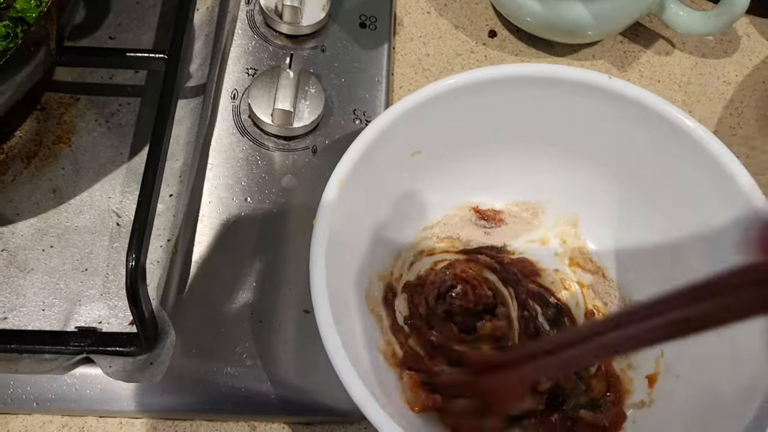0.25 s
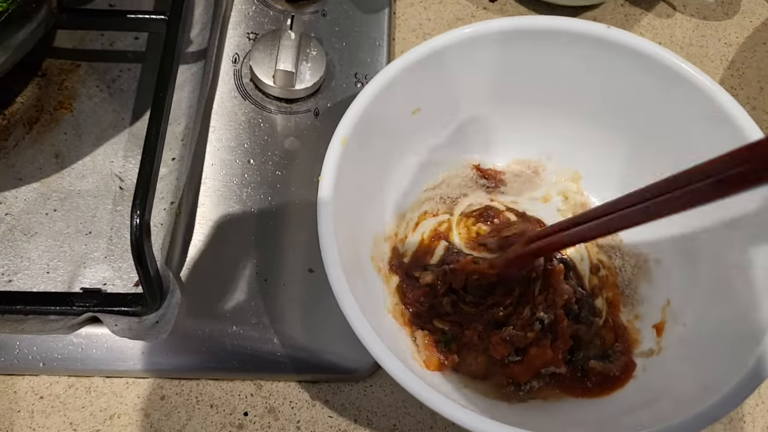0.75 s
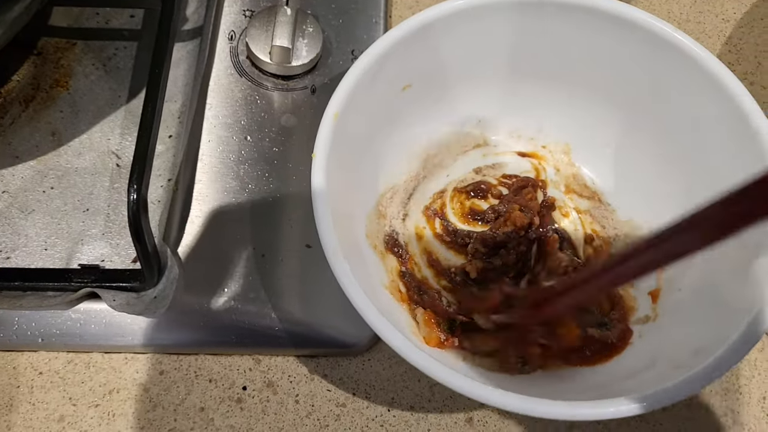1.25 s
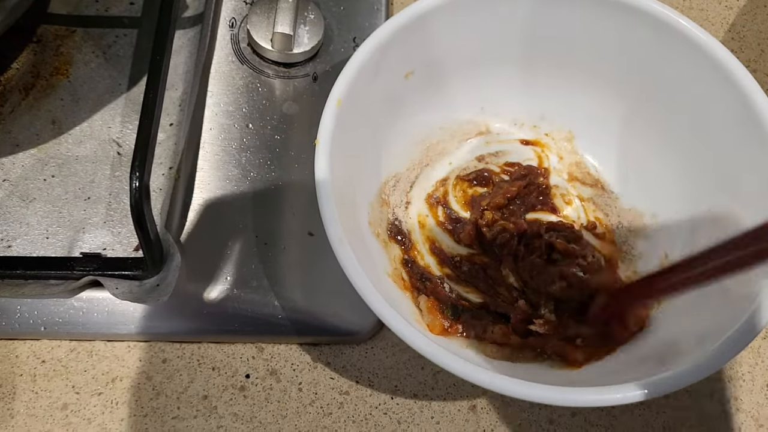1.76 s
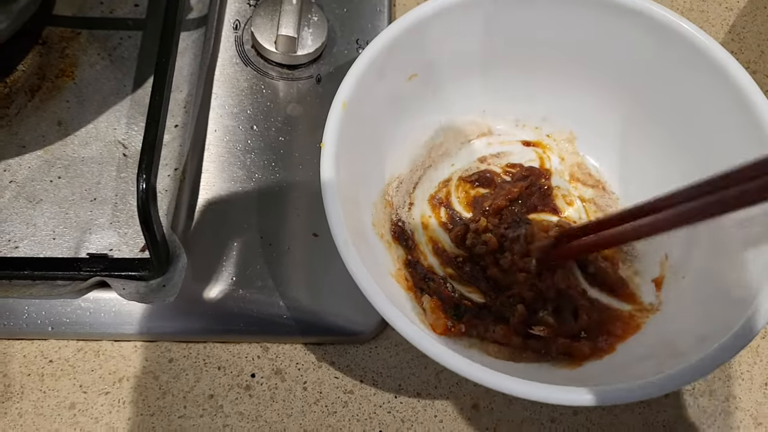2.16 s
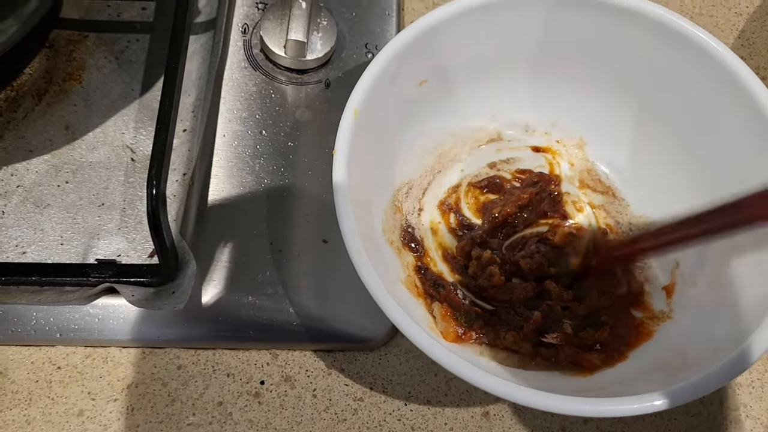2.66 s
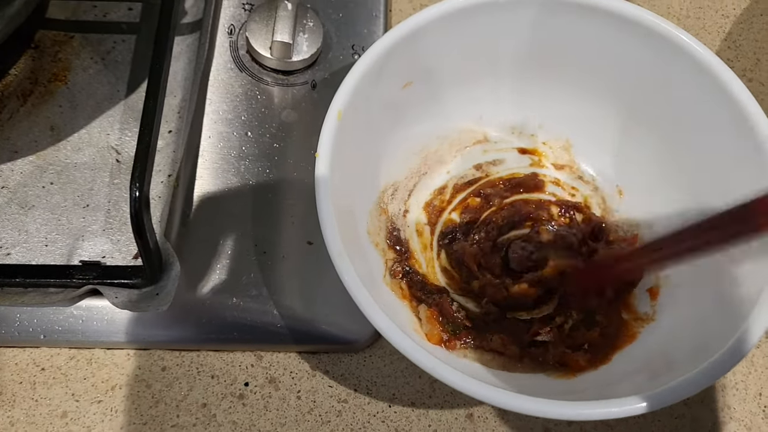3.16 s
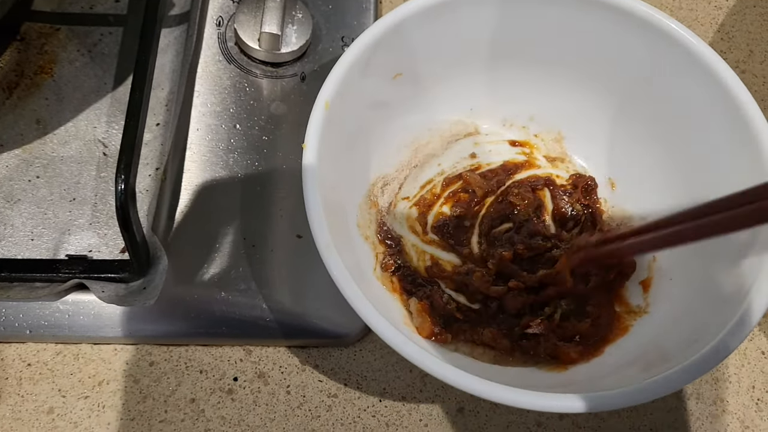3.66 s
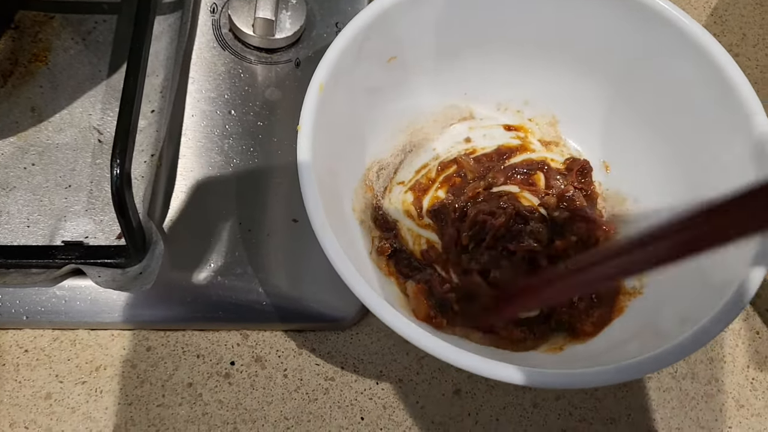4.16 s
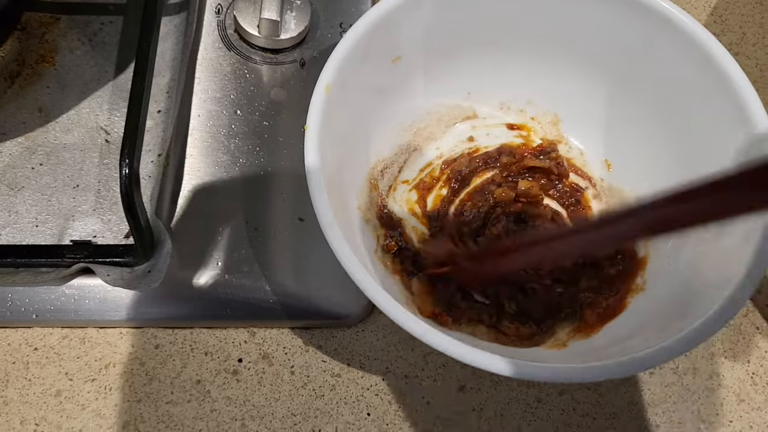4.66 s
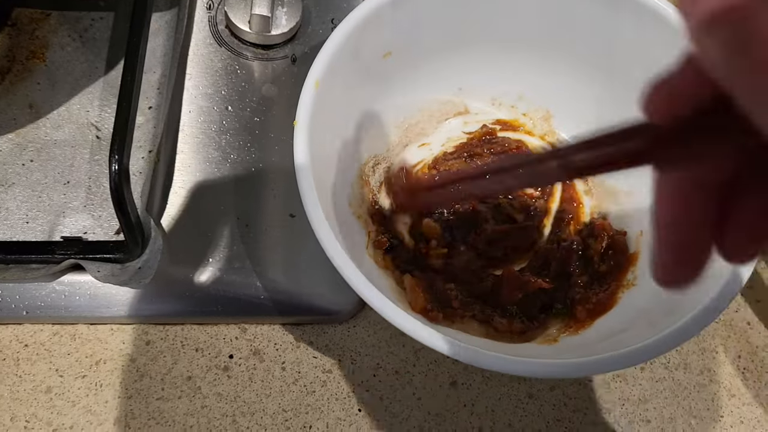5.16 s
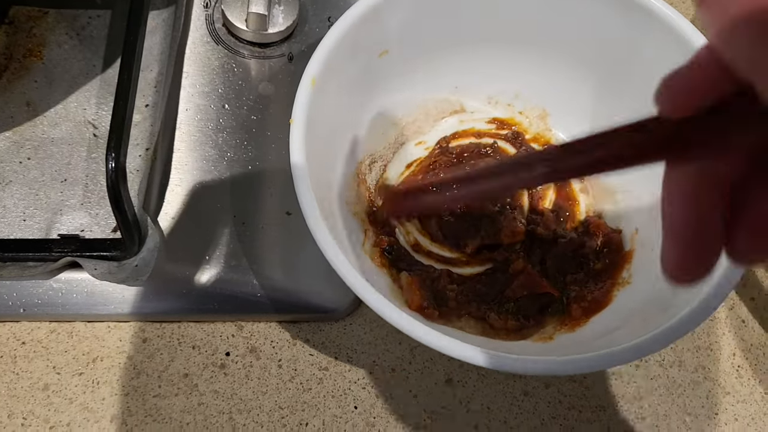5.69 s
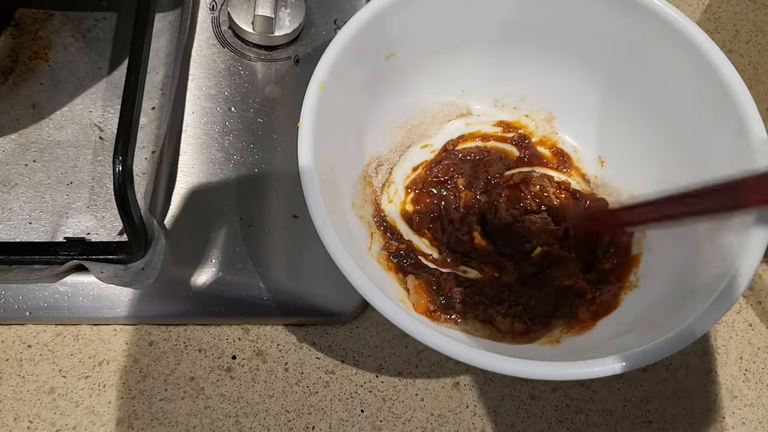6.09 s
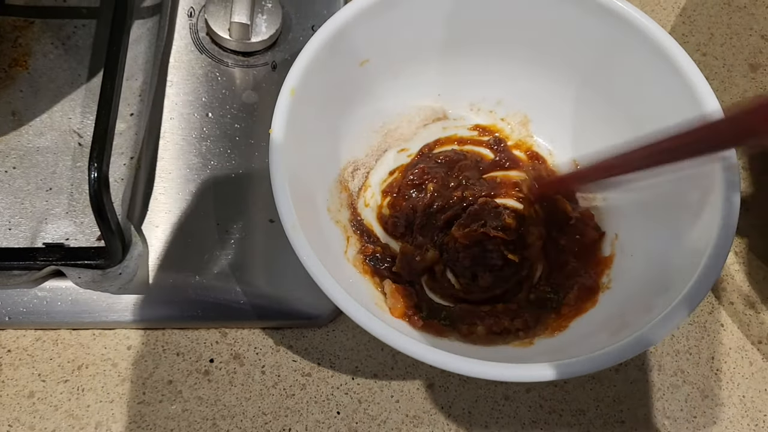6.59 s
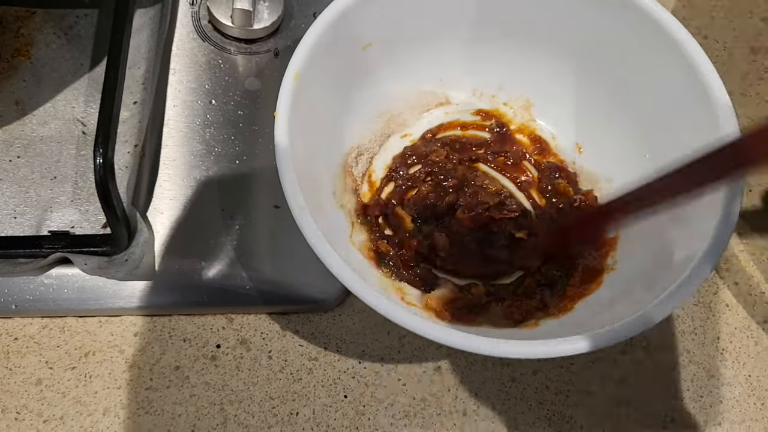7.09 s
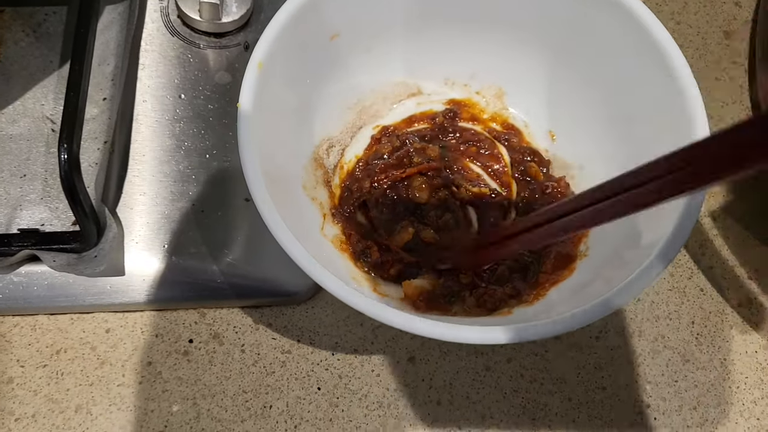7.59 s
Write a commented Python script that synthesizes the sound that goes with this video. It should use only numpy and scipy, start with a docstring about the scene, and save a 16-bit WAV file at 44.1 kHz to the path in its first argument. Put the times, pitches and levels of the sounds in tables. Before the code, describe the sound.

Thick sauce is worked with wooden chopsticks, about three or four strokes a second, right at the microphone. Each stroke squelches, pops and crackles, with soft rubbing along the bowl. Short dry clacks and bowl thumps punctuate the first two seconds, then become rare and faint. Smacks get louder again near the end. Dry, short kitchen reflections; quiet appliance hum and wavering low rumble behind.

```python
"""Wet smacks and a fine crackle stand out throughout: chopsticks stir a thick sauce in a light bowl, close up.
Air pockets ring as they open, torn film and very bright ticks crackle, and moving resonances shape fizz and rub.
The tips tap the ringing wall, and now and then the bowl rocks on the counter and excites its low modes.
An appliance hums low in the room over a wavering drone and shaped noise for the air."""
import sys
import numpy as np
from scipy import signal
from scipy.fft import rfft, irfft, next_fast_len
from scipy.io import wavfile
from scipy.ndimage import uniform_filter1d

SR = 44100
rng = np.random.default_rng(int(sys.argv[2]) if len(sys.argv) > 2 else 0)


def wrap_up_sound(samples):
    """Save the sound to the file named by the first command line argument, as 16-bit audio."""
    columns = np.atleast_2d(samples).T
    # keep every value between -1 and 1, then stretch to whole-number steps
    tamed = np.clip(columns, -1, 1)
    steps = np.round(tamed * 32767).astype(np.int16)
    wavfile.write(sys.argv[1], SR, steps)


N = 345744

# Loud air pockets opening in the sauce. Each row: start in seconds, relative pop level in dB,
# pocket pitch in Hz, relative snap level of the film in dB, left over right in dB.
LOUD_SMACKS = [(0.0678, -38, 4670, -37, 12), (0.1877, -37, 3150, -44, -3), (0.2089, -18, 3030, -42, -3),
               (0.2338, -29, 3040, -39, -8), (0.4671, -26.5, 2840, -40, -2.5),
               (0.5132, -36, 2570, -54, -18), (0.6457, -33.5, 2580, -45, -11),
               (0.6995, -28.5, 1890, -46, -7), (1.0982, -27, 3300, -40, 6), (1.1375, -31, 1960, -43, -1),
               (1.1674, -39, 2430, -47, -3), (1.4755, -23, 2350, -36, -9), (1.4816, -20, 3200, -33, -2),
               (1.505, -24, 1610, -46, -2), (1.6888, -13.5, 2030, -19.5, -4),
               (1.7205, -12.5, 2370, -34, -4), (1.7244, -22, 1400, -43, 3), (1.7957, -26, 5260, -38, 5),
               (1.8494, -23.5, 1870, -34, 4), (2.1286, -32.5, 2300, -38.5, -16.5),
               (2.3205, -34, 4600, -44, 4), (2.4346, -30.5, 1910, -35, -5), (2.4391, -30, 3030, -44, -8.5),
               (2.46, -27, 2870, -52, -5), (2.5302, -37, 3210, -46, -3), (2.8252, -14, 2320, -35.5, -13.5),
               (2.803, -33, 1950, -51, -10), (2.9059, -33.5, 2690, -43, 7), (2.946, -28.5, 1660, -37, -5),
               (3.112, -37, 3100, -36.5, -15), (3.2972, -36, 1270, -37, -3), (3.3212, -30, 2710, -34, -5),
               (3.353, -32.5, 3020, -35.5, -8), (3.482, -22, 3350, -26, 2), (3.4972, -22.5, 3200, -35, -7),
               (3.6623, -28.5, 2010, -41, -2), (3.685, -29, 2100, -39, -1),
               (3.7017, -31.5, 1600, -37.5, -10), (3.934, -26.5, 2580, -29, -11),
               (3.9429, -21, 1350, -36, -3), (3.965, -19.5, 1490, -42, 4), (4.1428, -40, 1400, -32.5, -7),
               (4.1674, -25.5, 2460, -37, -2), (4.1734, -25, 3280, -32.5, -7), (4.1982, -30, 2030, -41, -9),
               (4.2408, -27, 2960, -46, -4), (4.4138, -20, 1830, -42, -2.5), (4.4314, -27, 3000, -33, -12),
               (4.621, -45.5, 1740, -36.5, -7), (4.727, -27, 2220, -36.5, -5.5),
               (4.7582, -30, 2200, -49, 1), (4.8817, -35, 1760, -36, -7), (4.9164, -30, 3150, -39, -11.5),
               (4.9465, -27, 1970, -38, -5), (4.9817, -36, 2270, -42, -4), (5.187, -43, 2980, -34.5, -15),
               (5.3848, -39, 2300, -43, 2), (5.4214, -31, 2540, -40, -1), (5.5199, -57, 1780, -37, 1),
               (5.6703, -32.5, 1390, -47, -6), (5.7016, -19.5, 2740, -33.5, 0.5),
               (5.7074, -23.5, 2570, -38, 0), (5.7552, -23.5, 2420, -33, -15),
               (5.9308, -42.5, 1830, -41, -12), (6.0285, -29, 2780, -31.5, -10.5),
               (6.113, -27, 1550, -40, -2), (6.123, -23.5, 3250, -30, -13.5), (6.264, -25, 2900, -49, -1.5),
               (6.2787, -22.5, 1450, -30.5, -4), (6.4926, -18, 2020, -35.5, 3),
               (6.5076, -24, 1960, -49, -4), (6.5406, -32, 1680, -39, 11), (6.551, -25, 1700, -40, -12),
               (6.645, -43, 2110, -36, -11), (6.71, -33, 2460, -44, -3),
               (6.7239, -14.5, 2570, -27.5, -12.5), (6.7727, -30, 2630, -40.5, 9),
               (6.9867, -25, 1670, -41, -2), (6.9909, -26, 2960, -31, -4), (7.2237, -34.5, 1460, -49, -6),
               (7.2607, -26, 3330, -35, -2.5), (7.3013, -25.5, 1170, -30.5, 1.5),
               (7.5243, -20, 1450, -50, 1), (7.5353, -10, 2300, -32, -6), (7.7924, -19, 3040, -34.5, -2)]
# Very bright ticks, many together with smacks and taps. Each row: start in seconds, relative level in dB.
BRIGHT_TICKS = [(0.284, -14), (0.766, -23.5), (1.454, -28), (2.0177, -29), (2.129, -20), (2.2892, -27),
                (2.687, -21), (2.905, -22), (2.969, -23), (3.865, -28), (3.935, -23), (4.138, -24.5),
                (4.3557, -20.5), (4.621, -26), (5.698, -25), (6.7104, -28), (7.46, -23)]
# Pushes of the sticks through the sauce. Each row: time of full strength in seconds,
# hold in seconds, relative squelch level in dB, relative crackle level in dB.
PUSHES = [(0.0, 0.0087, -45, -44), (0.176, 0.056, -47, -44.5), (0.33, 0.092, -51, -45),
          (0.688, 0.075, -47.5, -45.5), (0.94, .07, -51, -47), (1.093, 0.076, -41, -46),
          (1.256, 0.12, -55, -51), (1.472, 0.074, -44, -45.5), (1.72, 0.11, -45.5, -46.5),
          (1.967, 0.024, -52.5, -47), (2.155, 0.037, -48, -45.5), (2.22, 0.085, -50.5, -49.5),
          (2.423, 0.033, -43.5, -48.5), (2.81, 0.18, -42.5, -50), (3.052, .08, -51.5, -49.5),
          (3.312, 0.044, -45.5, -43.5), (3.47, 0.043, -46.5, -48.5), (3.661, 0.037, -41, -45),
          (3.888, 0.017, -52, -43.5), (3.933, 0.081, -42.5, -50.5), (4.148, 0.082, -42.5, -45.5),
          (4.41, 0.11, -43, -46.5), (4.722, 0.084, -47, -47.5), (4.89, 0.11, -49, -50),
          (5.147, 0.079, -59, -48), (5.348, 0.078, -48, -46.5), (5.696, 0.13, -48, -46.5),
          (5.873, 0.049, -49.5, -47), (6.016, 0.066, -49, -47), (6.117, .03, -42, -53),
          (6.26, 0.054, -45.5, -49), (6.463, 0.14, -48, -49.5), (6.72, 0.068, -47, -50.5),
          (6.966, 0.043, -44.5, -48), (7.23, 0.044, -49, -49), (7.502, 0.092, -42, -50.5),
          (7.795, 0.022, -46, -55)]
# The sticks come to rest. Each row: start in seconds, end in seconds, drop in dB.
RESTS = [(0.787, 0.92, 3.5), (1.555, 1.685, 6.5), (2.017, 2.125, 26), (2.548, 2.7, 19), (3.23, 3.29, 9),
         (3.72, 3.865, 19), (4.558, 4.615, 6)]
# The tips dragging along the wall. Each row: time of full strength in seconds, hold in seconds,
# relative level in dB, resonance in Hz.
DRAGS = [(0.063, .05, -51.5, 1020), (0.206, 0.017, -41.5, 1310), (0.282, 0.1, -50, 800),
         (0.51, .05, -56.5, 900), (0.969, .06, -43.5, 980), (1.203, 0.067, -50.5, 1010),
         (1.275, 0.072, -54.5, 810), (1.49, 0.044, -49, 1360), (1.758, 0.1, -46.5, 1040),
         (1.93, 0.053, -53, 1200), (2.15, 0.072, -49, 970), (2.262, 0.048, -50.5, 650),
         (2.35, 0.078, -56, 840), (2.42, 0.044, -49.5, 1350), (2.708, 0.034, -55, 840),
         (2.826, 0.029, -49.5, 860), (2.984, 0.16, -55.5, 1080), (3.317, 0.12, -51.5, 1110),
         (3.503, 0.041, -52, 910), (3.597, 0.068, -47.5, 700), (3.939, 0.055, -43.5, 1290),
         (4.146, 0.053, -51, 1300), (4.243, 0.19, -56.5, 770), (4.402, 0.093, -51, 1290),
         (4.747, 0.048, -60, 1015), (5.118, 0.1, -54, 1140), (5.23, 0.036, -56, 720),
         (5.405, 0.089, -55.5, 1020), (5.802, .05, -54.5, 1090), (5.944, .03, -53.5, 990),
         (6.283, 0.15, -55.5, 1100), (6.472, .08, -49.5, 1220), (6.596, .04, -54, 850),
         (6.73, 0.09, -53.5, 1010), (6.902, 0.15, -53, 1110), (7.104, 0.04, -53.5, 870),
         (7.23, 0.1, -51.5, 1180)]
# Tips tapping the wall. Each row: start in seconds, relative blow level in dB,
# relative crack level in dB, tilt of the wall modes in dB per octave.
TAPS = [(0.057, -39.5, -36, -11), (0.091, -41, -55, -18), (0.286, -24.5, -32, -15), (0.299, -18.5, -25, -5),
        (0.513, -37, -56, -15), (1.044, -18.5, -23, -3), (1.205, -37, -36.5, -11),
        (1.283, -27.5, -42, -5.5), (1.689, -14.5, -29, -5), (1.722, -26.5, -48, -10),
        (2.129, -34.5, -30, -18), (2.685, -30.5, -34, -9), (3.868, -27, -32.5, -18), (3.963, -36, -49, -2),
        (4.254, -35, -52, -10.5), (5.265, -54.5, -63, -24), (5.753, -40, -44, -16), (6.281, -39.5, -41, 9),
        (7.301, -34, -49, -1.5)]
# The bowl rocking onto the counter. Each row: start in seconds, relative blow level in dB,
# tilt in dB per octave, fall on both sides of the main mode in dB per octave.
KNOCKS = [(0.302, -11, 2.5, 8), (1.045, -15.5, 0.5, -1.5), (1.284, -20, 1.5, 6), (1.689, -29, 0, -3),
          (2.129, -33.5, 1.5, -2.5), (2.683, -45.5, 12, 1.5), (3.868, -40, -3, -12), (4.259, -52.5, 4, 2),
          (5.268, -52.5, 9, -1)]
# Wall of the bowl. Each row: mode in Hz, relative level in dB, time to fall 60 dB in seconds.
WALL_MODES = [(770, -2.5, .09), (861, 2.5, .1), (935, -5.5, 0.12), (1047, 2, 0.053), (1273, 10, 0.067),
              (1474, 0, 0.11), (1650, -1, 0.045), (1820, 11.5, 0.041), (1962, 8.5, 0.091), (2300, 8, 0.063),
              (2574, 3, 0.056), (2999, 18, 0.053)]
# Bowl on its foot and the counter under it. Each row: mode in Hz, relative level in dB,
# time to fall 60 dB in seconds.
FOOT_MODES = [(95, -10, 0.3), (132, -4, 0.16), (195, -2, 0.073), (213.3, -4.5, .26), (272, -9.5, 0.17),
              (366.3, -8.5, 0.2), (397, -4.5, 0.08), (441.5, -12, .12), (566.5, -17, .11),
              (656, -22.5, 0.13)]

# Tone of the squelching pockets. Each row: frequency in Hz, relative density in dB per Hz.
SQUELCH_TONE = [(200, -25.5), (600, -21), (870, -8.5), (1100, -12.5), (1450, 2), (2100, 2), (3050, 1),
                (3600, -10), (5000, -12), (9000, -26.5)]
# Tone of the snapping film. Each row: frequency in Hz, relative density in dB per Hz.
SNAP_TONE = [(300, -42), (1200, -15.5), (3000, -3), (4400, -4), (5800, 6), (7900, 6.5), (8900, -13.5),
             (10500, -9.5), (13000, -8.5), (16000, -23)]
# Tone of the tearing film and fizz. Each row: frequency in Hz, relative density in dB per Hz.
CRACKLE_TONE = [(500, -16.5), (2500, -8.5), (4200, -7), (5700, -4.5), (7900, -0.5), (8900, -13.5),
                (10500, -10.5), (13000, -6.5), (16000, -11)]
# Tone of the rubbing tips. Each row: frequency in Hz, relative density in dB per Hz.
RUB_TONE = [(100, -16), (220, 4.5), (400, 5.5), (600, 1.5), (880, 1.5), (1250, -3), (1800, 2.5),
            (4000, -57)]
# Tone of a tap's thud and rattle. Each row: frequency in Hz, relative density in dB per Hz.
TAP_TONE = [(150, -28.5), (400, -9.5), (700, -1.5), (1150, 0), (1600, -12), (2600, -5.5), (3600, -9.5),
            (5200, -9.5), (8000, -27.5)]
# Tone of a tap's sharp crack. Each row: frequency in Hz, relative density in dB per Hz.
TAP_CRACK_TONE = [(600, -33), (1400, -12), (3200, -5), (4600, 4), (5800, 3), (7900, 1), (9000, -14),
                  (13000, -7.5), (16000, -15)]
# Tone of the low drone. Each row: frequency in Hz, relative density in dB per Hz.
DRONE_TONE = [(15, -27.5), (30, -16), (42, -0.5), (49, 5.5), (58, 1.5), (80, -17), (120, -12), (200, -39),
              (500, -54.5)]
# Tone of the room's air. Each row: frequency in Hz, relative density in dB per Hz.
ROOM_AIR_TONE = [(20, -2), (45, 1), (75, 0.5), (120, -1), (165, -12), (215, -2.5), (300, -11.5),
                 (450, -22.5), (900, -21), (2000, -28), (6000, -36.5), (16000, -33.5)]
# Swells of the low drone. Each row: time in seconds, relative level in dB.
DRONE_LEVEL = [(0, -49.5), (1.2, -48.5), (2.8, -53.5), (4.3, -48.5), (4.65, -44), (5.3, -53), (6.05, -40),
               (6.45, -39), (6.85, -43), (7.2, -40.5), (7.84, -53)]
# Appliance hum. Each row: partial in Hz, rms level in dB.
HUM = [(48.5, -56.5), (99, -61), (210, -70)]
# Diffuse sound at the two microphone ports. Each row: frequency in Hz, likeness from -1 to 1.
LIKENESS = [(60, 0.9), (150, 0.7), (300, 0.8), (640, -0.09), (1400, 0), (16000, 0)]
# Sensitivity of the two microphone ports. Each row: frequency in Hz, left over right in dB.
BALANCE = [(60, -3.4), (200, -2.3), (400, -6), (1300, -1), (2400, -4.5), (4400, 2), (8000, 0),
           (15000, -0.5)]

TIME = np.arange(N) / SR
SIZE = next_fast_len(N + SR)
FREQS = np.maximum(np.fft.rfftfreq(SIZE, 1 / SR), 1)
STEREO_HALVES = np.array([[.5], [-.5]])   # splits a left-over-right dB figure between the ports
LEFT_LAG_S, CUTOFF_HZ = .00016, 16100
STIRS_PER_S = 3.7   # mean rate of the tips' round
POCKET_LOW_HZ = 990
# a pocket's neighbours give way with it, growing as much as the pop does (in dB per dB)
CLUSTER_LEAD_S, CLUSTER_T60_S = .0062, 0.046
CLUSTER_FOLLOWS, MEAN_POP_DB = 1, -24
# pockets too small to single out; levels over the squelch and the crackle
SMALL_SMACKS_PER_S, SMALL_POP_DB, SMALL_SNAP_DB = 9, 4.5, 1
SMALL_POCKET_HZ, SMALL_POCKET_OCTAVES = 2200, 0.79
PUSH_ATTACK_S, PUSH_RELEASE_S = 0.033, 0.18   # release: time to fall 60 dB
DRAG_ATTACK_S, DRAG_RELEASE_S = .03, 0.23
# relative levels while the sticks move on between pushes
BETWEEN_SQUELCH_DB, BETWEEN_CRACKLE_DB, BETWEEN_RUB_DB = -55.5, -52, -61.5
SETTLE_S = .035   # time the sauce takes to fall quiet


def smacks(rows, pop_db, cluster_db, snap_db, cycles, gap_hz, gap_db):
    """The film snaps, the pocket rings with the gap between the sticks, and its neighbours give way."""
    pops, clusters, snaps = np.zeros((3, 2, N))
    for s, level_db, hz, film_db, pan_db in rows:
        ring = pocket(hz, cycles) + from_db(gap_db) * pocket(gap_hz, cycles=1.58)
        add(pops, s, from_db(level_db + pop_db + pan_db * STEREO_HALVES) * ring)
        swarm_db = MEAN_POP_DB + CLUSTER_FOLLOWS * (level_db - MEAN_POP_DB) + cluster_db
        swarm = from_db(swarm_db) * cluster(CLUSTER_LEAD_S, CLUSTER_T60_S)
        add(clusters, s - CLUSTER_LEAD_S, swarm)
        add(snaps, s, from_db(film_db + snap_db) * crack(t60=0.02, spray=0.91))
    pops = low_cut(pops + 1e-18, POCKET_LOW_HZ)   # small openings radiate little bass
    return pops + colour(clusters, SQUELCH_TONE) + colour(snaps, SNAP_TONE)


def pocket(hz, cycles):
    """A pocket of air swells and rings for a few cycles, under an envelope of height 1."""
    turns = TIME[:SR // 50] * hz
    envelope = (turns / cycles * np.exp(1 - turns / cycles)) ** 2
    return envelope * np.sin(2 * np.pi * turns)


def small_smacks(squelch, crackle, spread_db, pan_db):
    """Faint pockets open at random, their level following the stirring; rows like LOUD_SMACKS."""
    rows = []
    for when, size, pitch, side in rng.random((int(SMALL_SMACKS_PER_S * N / SR), 4)):
        i = int(when * N)
        size_db = spread_db * (2 * size - 1)
        pop_db = 20 * np.log10(squelch[i]) + SMALL_POP_DB + size_db
        film_db = 20 * np.log10(crackle[i]) + SMALL_SNAP_DB + size_db
        hz = SMALL_POCKET_HZ * 2 ** (SMALL_POCKET_OCTAVES * (2 * pitch - 1))
        rows.append((i / SR, pop_db, hz, film_db, pan_db * side))
    return rows


def bright_ticks(tick_db, low_hz):
    """Very bright ticks, many together with smacks and taps: clicks with a spray, their lows cut."""
    out = np.zeros(N)
    for s, level_db in BRIGHT_TICKS:
        add(out, s, from_db(level_db + tick_db) * crack(t60=0.013, spray=1.4))
    return low_cut(out, min(low_hz, .4 * SR))


def effort():
    """Gains of squelch, crackle and rub: pushes and drags swell over a floor that sinks at each rest."""
    drop_db = sum(db * np.clip((TIME - start) / SETTLE_S, 0, 1) * (TIME < end) for start, end, db in RESTS)
    moving = from_db(-drop_db)
    squelch = from_db(BETWEEN_SQUELCH_DB) * moving
    crackle = from_db(BETWEEN_CRACKLE_DB) * moving
    rub = from_db(BETWEEN_RUB_DB) * moving
    for s, length, squelch_db, crackle_db in PUSHES:
        push = swell(s, length, PUSH_ATTACK_S, PUSH_RELEASE_S)
        squelch = np.maximum(squelch, from_db(squelch_db) * push)
        crackle = np.maximum(crackle, from_db(crackle_db) * push)
    for s, length, db, _ in DRAGS:
        rub = np.maximum(rub, from_db(db) * swell(s, length, DRAG_ATTACK_S, DRAG_RELEASE_S))
    return squelch, crackle, rub


def stirring(squelch, crackle, squelch_db, crackle_db, fizz_db, clump_db):
    """Small pockets squelch in clumps, film tears in ticks, and air in narrow gaps fizzes at a wandering pitch."""
    sticky = rms_one(from_db(clump_db * np.clip(wander(per_s=60), -2, 2)))
    pockets = grains(per_s=480, spread_db=2.5, even_s=0.12, bed=0.28)
    pockets = from_db(squelch_db) * squelch * sticky * pockets
    ticks = from_db(crackle_db) * crackle * grains(per_s=1600, spread_db=7.0, even_s=0.11, bed=0.54)
    fizz = grains(per_s=4000, spread_db=5.5, even_s=0.052, bed=0.18)
    fizz = from_db(fizz_db) * crackle * sticky * fizz
    gap_hz = 5700 * 2 ** np.clip(0.39 * wander(per_s=45), -1, 1)
    film = ticks + glide(fizz, gap_hz, width_hz=1350)
    return colour(pockets, SQUELCH_TONE) + colour(film, CRACKLE_TONE)


def dragging(rub, rub_db):
    """The tips slip along the wall; the resonance slides from each drag's place to the next."""
    rub_hz, = in_time([(s + length / 2, hz) for s, length, _, hz in DRAGS])
    slips = from_db(rub_db) * rub * grains(per_s=1100, spread_db=4.0, even_s=0.056, bed=0.54)
    return colour(glide(slips, rub_hz, width_hz=530), RUB_TONE)


def wall(x, ring_db):
    """The wall of the bowl rings faintly with whatever happens in the sauce."""
    ring = ringing(WALL_MODES, 0, 0, 1360, detune=.004)
    ring = ring / abs(rfft(ring)).max()   # strongest frequency at unit gain
    return x + from_db(ring_db) * signal.oaconvolve(x, ring[None], axes=1)[:, :N]


def taps(thud_db, rattle_db, ring_db, crack_db):
    """A wooden tip hits the wall: a crack, a short thud, a rattle of the tip and the ring of the wall."""
    thuds, rings, cracks = np.zeros((3, N))
    for s, level_db, sharp_db, tilt_db in TAPS:
        add(thuds, s, from_db(level_db + thud_db) * crack(t60=0.0022, spray=0.46))
        add(thuds, s, from_db(level_db + rattle_db) * cluster(0.0015, t60=0.11))
        ring = ringing(WALL_MODES, tilt_db, 0, 1430, detune=0.0084)
        add(rings, s, from_db(level_db + ring_db) * ring)
        add(cracks, s, from_db(sharp_db + crack_db) * crack(t60=0.013, spray=0.79))
    return colour(thuds, TAP_TONE) + rings + colour(cracks, TAP_CRACK_TONE)


def knocks(knock_db):
    """The foot of the bowl drops back on the counter and sets off their shared low modes."""
    out = np.zeros(N)
    for s, level_db, tilt_db, focus_db in KNOCKS:
        ring = ringing(FOOT_MODES, tilt_db, focus_db, 177.6, detune=0.0035)
        add(out, s, from_db(level_db + knock_db) * ring)
    return out


def hob(ring_db, hz, t60):
    """The first and hardest knock seems to shake the steel hob beside the bowl, which rings thinly."""
    out, t = np.zeros(N), TIME[:SR]
    add(out, KNOCKS[0][0], from_db(ring_db) * np.sin(2 * np.pi * hz * t) * fade(t, t60))
    return out


def surroundings(x, hollow_db, hollow_t60, room_db, room_t60, count):
    """Direct sound, bowl hollow and kitchen; the echoes differ at each of count spots on the tips' round."""
    t, out = TIME[:SR // 3], np.zeros((2, N))
    pace = STIRS_PER_S * rng.uniform(.5, 1.5, 32)[np.arange(N) * 32 // N]
    place = np.cumsum(pace) / SR * count
    echoes = diffuse()[:, :2 * count * len(t)].reshape(2, count, 2, len(t))
    spaces = ((hollow_db, hollow_t60, .0008), (room_db, room_t60, .008))   # dB, t60 s, build-up s
    for spot in range(count):
        response = np.zeros((2, len(t)))
        for k, (db, t60, build_s) in enumerate(spaces):
            tail = echoes[:, spot, k] * fade(t, t60) * (1 - np.exp(-t / build_s))
            response += from_db(db) * tail / np.linalg.norm(tail, axis=1, keepdims=True)
        lag_s = LEFT_LAG_S * rng.uniform(.6, 1.4)
        response[0, round(lag_s * SR)] += .85   # the left port is farther away
        response[1, 0] += 1
        here = place.astype(int) % count == spot
        gate = uniform_filter1d(here * 1., 64)   # short crossfade between spots
        out += signal.oaconvolve(x * gate * np.ones((2, 1)), response, axes=1)[:, :N]
    return out


def background(air_db, drone_db, waver_db):
    """An appliance hums in steady sines over a wavering low drone and the air of the room."""
    hum = np.zeros(N)
    for hz, db in HUM:
        hum += np.sqrt(2) * from_db(db) * np.sin(2 * np.pi * (hz * TIME + rng.random()))
    level_db = in_time(DRONE_LEVEL)[0] + drone_db + waver_db * wander(per_s=8)
    drone = from_db(level_db) * colour(diffuse(), DRONE_TONE)
    return hum + drone + from_db(air_db) * colour(diffuse(), ROOM_AIR_TONE)


def ringing(modes, tilt_db, focus_db, pivot_hz, detune):
    """One blow on a set of modes; where it lands changes their strengths, the shifting sauce their pitch."""
    t = TIME[:SR // 2]
    hz, db, t60 = np.transpose(modes)[:, :, None]
    octaves = np.log2(hz / pivot_hz)
    tilt = tilt_db * np.clip(octaves, -2, 2)
    focus = focus_db * np.minimum(abs(octaves), 1)
    gain = from_db(db + tilt - focus + rng.standard_normal(hz.shape))
    hz = hz * (1 + detune * rng.uniform(-0.82, 1, hz.shape))
    signs = (-1) ** np.arange(len(hz))[:, None]
    return np.sum(gain * signs * np.sin(2 * np.pi * hz * t) * fade(t, t60), axis=0)


def crack(t60, spray):
    """A sharp click of unit energy that trails a spray of other clicks."""
    t = TIME[:SR // 10]
    trail = rng.standard_normal(len(t)) ** 3 * fade(t, t60)
    burst = spray * trail / np.linalg.norm(trail)
    burst[0] = 1
    return burst / np.linalg.norm(burst)


def cluster(lead_s, t60):
    """Tiny contacts of unit total energy: they begin lead_s before a blow and die away after it."""
    t = TIME[:SR // 8] - lead_s
    sizes = rng.standard_normal(len(t))
    envelope = np.where(t < 0, 0.43 * (1 + t / lead_s), fade(t, t60))
    swarm = sizes * abs(sizes) * envelope
    return swarm / np.linalg.norm(swarm)


def grains(per_s, spread_db, even_s, bed):
    """Random clicks of very uneven size on a bed of tiny ones, at a steady mean level."""
    sizes = from_db(spread_db * np.minimum(rng.exponential(1, N), 5)) * rng.choice([-1, 1], N)
    clicks = rms_one(sizes * (rng.random(N) < per_s / SR)) + bed * rng.standard_normal(N)
    power = uniform_filter1d(clicks ** 2, max(int(even_s * SR), 2))
    return clicks / np.sqrt(power + 1e-9)


def swell(s, length, attack_s, release_s):
    """Rises until s, holds for length, then dies away."""
    rise = np.clip(1 + (TIME - s) / attack_s, 0, 1)
    return rise * fade(np.clip(TIME - s - length, 0, release_s * 2), release_s)


def wander(per_s):
    """A random course: straight lines between per_s normal draws a second."""
    moments = np.arange(0, TIME[-1] + 1, 1 / per_s)
    return np.interp(TIME, moments, rng.standard_normal(len(moments)))


def glide(x, hz, width_hz, size=256):
    """A resonance whose centre moves; keeps the power of white noise."""
    r, out, state = np.exp(-np.pi * width_hz / SR), np.zeros(N), np.zeros(2)
    for i in range(0, N, size):
        poles = [1, -2 * r * np.cos(2 * np.pi * hz[i] / SR), r * r]
        out[i:i + size], state = signal.lfilter([1, 0, -1], poles, x[i:i + size], zi=state)
    return out * np.sqrt((1 - r * r) / 2)


def diffuse():
    """White stereo noise, alike at both ports mainly in the bass."""
    mid, side = rfft(rng.standard_normal((2, SIZE)))
    alike = np.clip(at_hz(LIKENESS), -1, 1)
    shared = np.sqrt((1 + alike) / 2) * mid
    opposed = np.sqrt((1 - alike) / 2) * side * [[1], [-1]]
    return irfft(shared + opposed, SIZE)[:, :N]


def colour(x, spectrum):
    """Causal (minimum-phase) filter of unit mean power."""
    cepstrum = irfft(np.log(rms_one(from_db(at_hz(spectrum)))), SIZE)
    cepstrum[1:SIZE // 2] *= 2   # fold onto positive time
    cepstrum[SIZE // 2 + 1:] = 0
    return irfft(rfft(x, SIZE) * np.exp(rfft(cepstrum)), SIZE)[..., :N]


def low_cut(x, hz):
    """Second-order high-pass filter."""
    return signal.sosfilt(signal.butter(2, hz, "high", fs=SR, output="sos"), x)


def fade(t, t60):
    """Exponential decay that falls 60 dB in t60 seconds."""
    return from_db(-60 * t / t60)


def from_db(db):
    """Decibels to gain."""
    return 10 ** (np.asarray(db) / 20)


def rms_one(x):
    """Scale to rms 1."""
    return x / np.sqrt(np.mean(x ** 2) + 1e-20)


def in_time(rows):
    """The columns of a curve at every sample."""
    s, *columns = np.transpose(rows)
    return [np.interp(TIME, s, c) for c in columns]


def at_hz(points):
    """A table read at every frequency, on a log axis."""
    hz, value = np.transpose(points)
    return np.interp(np.log(FREQS), np.log(hz), value)


def add(out, s, sound):
    """Mix a short sound in at time s."""
    start = max(round(s * SR), 0)
    out[..., start:start + sound.shape[-1]] += sound[..., :N - start]


def scene():
    """Everything in the bowl shares its hollow; the knocks come from under it."""
    squelch, crackle, rub = effort()
    rows = LOUD_SMACKS + small_smacks(squelch, crackle, spread_db=8, pan_db=-12)
    sauce = smacks(rows, pop_db=2.0, cluster_db=12.5, snap_db=24.5, cycles=1.08, gap_hz=2850, gap_db=-8.5)
    sauce = sauce + bright_ticks(tick_db=12.5, low_hz=7300)
    sauce = sauce + stirring(squelch, crackle, squelch_db=-2.5, crackle_db=-0.5, fizz_db=-6, clump_db=3.0)
    sauce = sauce + dragging(rub, rub_db=-9.5)
    inside = wall(sauce, ring_db=-2) + taps(thud_db=14, rattle_db=19.5, ring_db=-18, crack_db=22.0)
    bowl = surroundings(inside, hollow_db=-4.0, hollow_t60=0.035, room_db=-11, room_t60=0.15, count=9)
    foot = surroundings(knocks(knock_db=-4.0), hollow_db=-16.0, hollow_t60=0.013,
                        room_db=-11, room_t60=0.6, count=1)
    room = background(air_db=-51.5, drone_db=-2.5, waver_db=3)
    return bowl + foot + hob(ring_db=-43.5, hz=2690, t60=0.66) + room


def record(dry):
    """The right port is more sensitive below the treble; peaks are rounded and the top is cut."""
    port_gain = from_db(at_hz(BALANCE) * STEREO_HALVES)
    heard = irfft(rfft(dry, SIZE) * port_gain, SIZE)[:, :N]
    rounded = 1.344 * np.tanh(heard / 1.259)
    top_cut = signal.ellip(12, .2, 90, CUTOFF_HZ, fs=SR, output="sos")
    return signal.sosfilt(top_cut, rounded)


dry = scene()
out = record(dry)
wrap_up_sound(out)
```